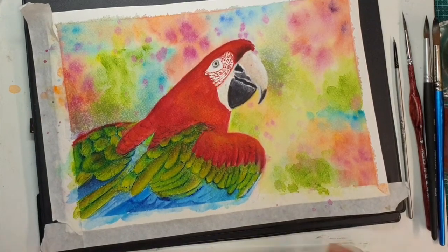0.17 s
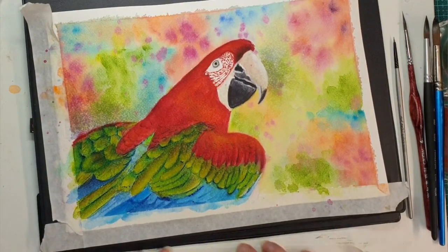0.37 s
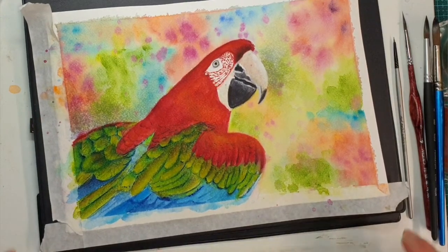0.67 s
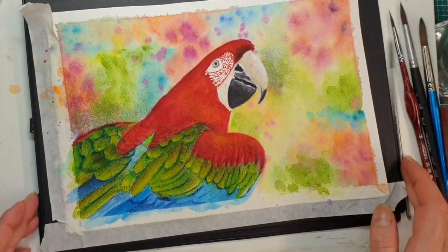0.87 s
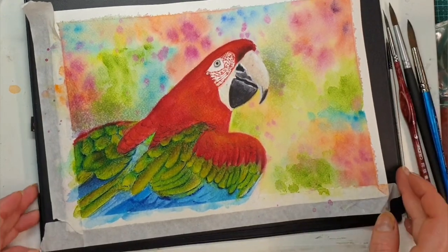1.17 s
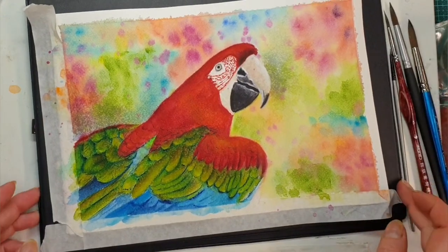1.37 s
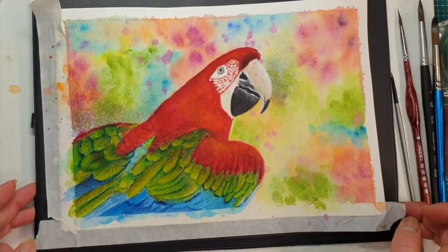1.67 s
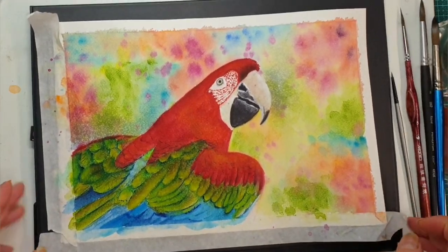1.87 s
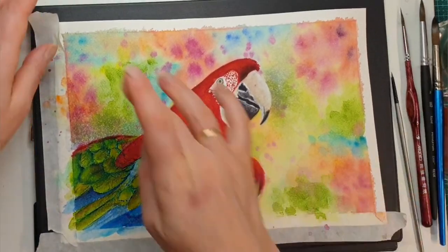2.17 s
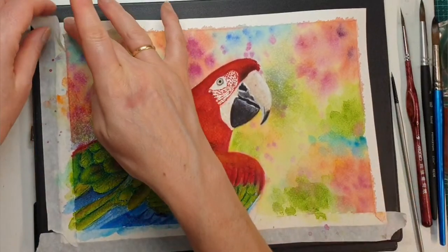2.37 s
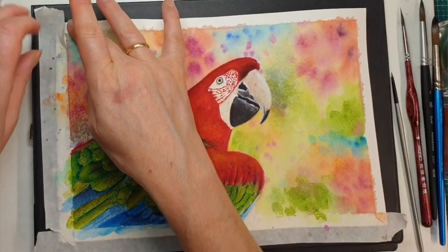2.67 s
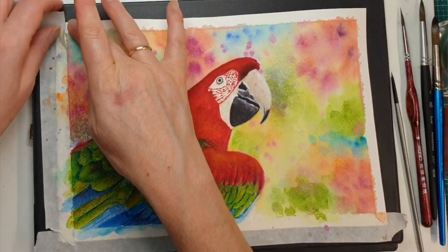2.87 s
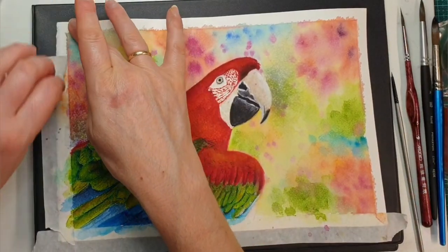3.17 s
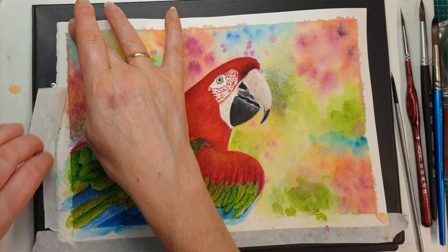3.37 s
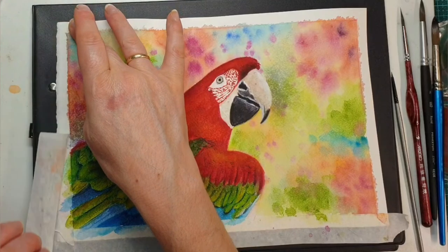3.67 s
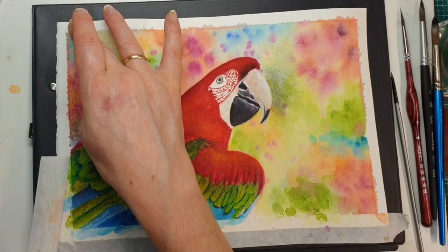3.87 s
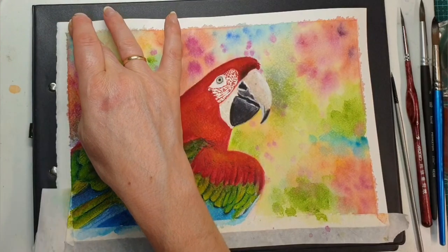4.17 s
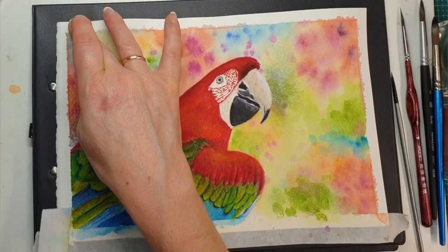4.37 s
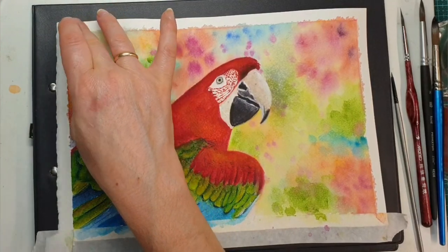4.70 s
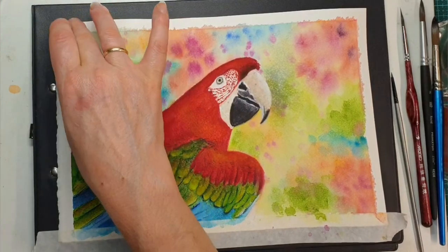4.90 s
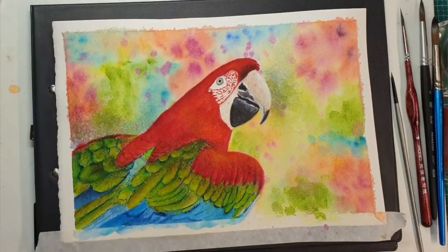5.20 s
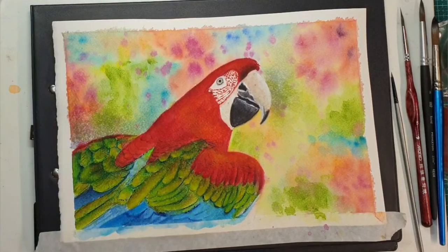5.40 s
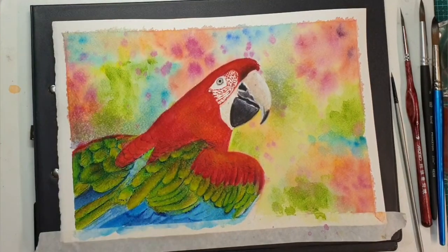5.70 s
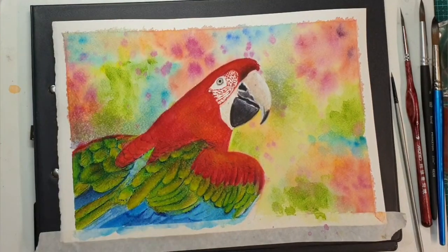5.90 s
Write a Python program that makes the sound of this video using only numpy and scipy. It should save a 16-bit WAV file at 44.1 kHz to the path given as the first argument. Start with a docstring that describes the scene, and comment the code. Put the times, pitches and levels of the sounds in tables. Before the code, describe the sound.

A quiet indoor room with soft air noise, a very faint fan whine and a low mains hum that swells and fades. At the start skin lightly brushes paper, with a clearer swish at 0.4-0.6 s. At 0.8-0.95 s thin paintbrushes knock together in a rapid, bright, woody rattle; one sharp clack follows at 1.17 s. Light scrapes and finger ticks continue to 1.9 s as the board is turned. After near quiet, a soft low palm thud comes at 2.35 s, with small taps and drags until 3 s. From 3.1 s tape peels with a strong crackling, raspy rip to 3.6 s, another surge at 3.7-4.0 s, then shorter, weaker stutters to about 5.2 s, punctuated by crisp snaps, notably at 3.2 and 3.9 s. A finger tap falls at 5.07 s; loose tape rustles softly at 5.4 and 5.7 s. Close, dry stereo.

```python
"""Peeling tape from paper

Masking tape is peeled off a watercolour on a desk, in a quiet room with a fan and a mains hum.
Hands brush the desk, knock paintbrushes together, turn the board and press on the paper;
then one strip comes away in a long crackling peel with small snaps, and the loose tape rustles.
Friction and peeling are trains of random grains; contacts are decaying noise bursts and ringing modes."""
import sys
import numpy as np
from scipy import signal
from scipy.fft import rfft, irfft, next_fast_len
from scipy.io import wavfile
from scipy.ndimage import uniform_filter1d, map_coordinates

SR = 44100
rng = np.random.default_rng(int(sys.argv[2]) if len(sys.argv) > 2 else 0)


def unload_audio(sound):
    """Save the sound as a 16-bit wav file, at the path given as the first command line argument."""
    columns = np.transpose(np.atleast_2d(sound))
    # keep every value between -1 and 1, then stretch to whole-number steps
    steps = np.round(np.clip(columns, -1, 1) * 32767)
    wavfile.write(sys.argv[1], SR, steps.astype(np.int16))


N = 266540  # length [samples]

# Levels in the tables are relative: each source function sets the balance of its layers.
# Pulls on the tape: (start [s], fastest [s], end [s], crackle level [dB], rise [dB], fall [dB],
# rasp re crackle [dB], drumming re crackle [dB])
TAPE_PULLS = [(3.086, 3.224, 3.59, -43.5, 14.5, 15, -3, -9), (3.69, 3.87, 3.98, -48.5, 11.5, 4, -6.5, -15),
              (4.03, 4.075, 4.1, -47.5, 4, 2, -9, -18.5), (4.12, 4.131, 4.485, -53, 1.5, 6.5, -10, -17.5),
              (4.52, 4.74, 4.84, -61, 4, 6, -18, -10.5), (4.852, 4.86, 4.872, -44, -1.5, 6.5, -31, -17),
              (4.982, 5.06, 5.21, -56, 3, 5.5, -4, -9.5)]
# Tape creeping off between pulls: (start [s], fastest [s], end [s], crackle level [dB], rise [dB], fall [dB])
TAPE_CREEP = (3.07, 2.5, 6, -62.5, 11, 5)
# Tape letting go and creasing: (time [s], level [dB])
TAPE_SNAPS = [(1.3069, -35.5), (3.1088, -34.5), (3.2176, -22), (3.2274, -27), (3.2774, -22.5),
              (3.4401, -30.5), (3.5558, -33), (3.681, -37), (3.7484, -33.5), (3.8906, -19), (3.9529, -25),
              (3.9654, -30), (4.0896, -21.5), (4.3704, -41.5), (4.4303, -28.5), (4.7296, -32.5),
              (4.8544, -30.5), (4.9807, -38), (5.395, -41.5)]
# Skin and loose tape sweeping over paper: (start [s], fastest [s], end [s], hiss level [dB],
# rise [dB], fall [dB], body re hiss [dB])
PAPER_SWEEPS = [(0.012, 0.11, 0.14, -46.5, 3, 2.5, -14), (0.425, 0.54, 0.605, -34.5, 21.5, 14, -21),
                (0.608, 0.62, 0.625, -48, 0.5, 3, -5), (5.397, 5.445, 5.49, -43.5, 9, 14.5, -26),
                (5.63, 5.675, 5.8, -44, 10.5, 19, -23)]
# Board, fingers and slack tape dragging on the desk: (start [s], fastest [s], end [s], scrape level [dB],
# rise [dB], fall [dB], body re scrape [dB])
DESK_DRAGS = [(0.996, 1.01, 1.094, -56, -1, 16.5, 0.5), (1.11, 1.2, 1.51, -59, 5, 7, -13),
              (1.44, 1.5, 1.595, -56, 8, 5, 2.5), (1.65, 1.67, 1.933, -48.5, 2, 17.5, -7),
              (2.4, 2.47, 2.6, -59.5, 11, 7, -6.5), (2.885, 2.96, 3.01, -60.5, 0.5, 1.5, -11),
              (5.31, 5.8, 6.4, -63.5, 4, 14, -38)]
# Paintbrushes knocking together: (time [s], click level [dB], ring level [dB], wooden knock level [dB])
BRUSH_CLACKS = [(0.811, -44, -38, -36), (0.8299, -38.5, -33, -30), (0.8369, -25.5, -16.5, -24.5),
                (0.8456, -22.5, -7, -25.5), (0.8540, -18.5, -10, -17.5), (0.8745, -19.5, -21.5, -22),
                (0.8836, -24, -32.5, -28.5), (0.9010, -23.5, -38.5, -30), (0.9125, -28, -38.5, -27),
                (0.9211, -19, -33.5, -22), (0.9272, -24, -44, -22.5), (1.1652, -31, -24, -48),
                (1.1700, -11, -17, -24.5), (1.2, -30, -33, -50.5)]
# Modes of the brush handles and ferrules: (mean frequency [Hz], mean level [dB], t60 [s])
HANDLE_MODES = [(1890, -13, 0.033), (2520, -11.5, 0.047), (2970, -9.5, 0.026), (3700, -12.5, 0.046),
                (4040, -10.5, 0.02), (4850, -17.5, 0.049), (4780, 0, 0.069), (5220, 3.5, 0.033),
                (5590, -1, .04), (5430, -0.5, 0.048), (7030, -8, .035), (7050, 1, 0.037), (7740, 2, .035),
                (7930, -12, .035), (8340, -5, 0.045), (8440, -12, 0.036), (8700, -12, 0.024),
                (9620, 1, .035), (10760, -7, .035)]
# Fingers meeting the board and paper, and at 5.07 s a tick from the peeling strip: (time [s], tick level [dB],
# body re tick [dB])
FINGER_TAPS = [(0.993, -34, -17), (1.4452, -40.5, -7), (1.5697, -32, -18), (1.6518, -39.5, -16),
               (2.4628, -41, -21.5), (2.5526, -36.5, -15.5), (2.9083, -40.5, -21), (2.9216, -40, -1.5),
               (5.0654, -31.5, -12.5)]

# Spectrum of the peeling tape's hiss: (frequency [Hz], density [dB per Hz])
TAPE_SPECTRUM = [(1500, -36), (3000, -15), (4100, -14.5), (4700, -3), (5300, 0.5), (6300, -4), (8200, -2),
                 (9800, -4.5), (11500, -2.5), (15500, -8.5)]
# Spectrum of the taut strip's rasp: (frequency [Hz], density [dB per Hz])
RASP_SPECTRUM = [(1400, -27), (2200, -10.5), (2900, 7), (3600, 8.5), (4400, 1), (7000, -42)]
# Spectrum of the drumming paper sheet: (frequency [Hz], density [dB per Hz])
SHEET_SPECTRUM = [(150, -13.5), (350, -17), (560, -7), (780, 3), (1100, 0), (1500, 0.5), (2200, -2),
                  (3500, -23), (7000, -77)]
# Spectrum of the tick as tape lets go: (frequency [Hz], density [dB per Hz])
SNAP_SPECTRUM = [(1200, -19), (2100, -20), (2800, -8), (3900, -8.5), (5200, 11), (6500, 4), (8200, 4),
                 (11500, 1.5), (15500, -2)]
# Spectrum of skin and loose tape on paper: (frequency [Hz], density [dB per Hz])
SKIN_SPECTRUM = [(1200, -41), (2000, -8.5), (3200, -4.5), (4000, -3), (5300, 0), (8000, -0.5), (12000, 0.5),
                 (15500, -3.5)]
# Spectrum of the board shaken by sweeps: (frequency [Hz], density [dB per Hz])
BOARD_SPECTRUM = [(150, -27), (400, -9), (750, 5), (1050, -0.5), (1400, 3), (1900, 2), (2600, 4.5),
                  (5000, -47.5)]
# Spectrum of scrapes and fingertip ticks: (frequency [Hz], density [dB per Hz])
SCRAPE_SPECTRUM = [(1200, -23), (2600, -2), (3900, -8.5), (5300, 1.5), (6500, -3.5), (7800, 1),
                   (11000, -2.5), (15500, -11)]
# Spectrum of the brushes' click: (frequency [Hz], density [dB per Hz])
CLICK_SPECTRUM = [(800, -15.5), (2000, -29.5), (3500, -6), (5000, 7), (6500, -5), (9500, -0.5),
                  (11500, -6.5), (16000, -13.5)]
# Spectrum of the brushes' knock on the desk: (frequency [Hz], density [dB per Hz])
KNOCK_SPECTRUM = [(60, -38), (170, -17), (280, -17), (430, -2.5), (600, -8), (830, 4), (1050, -2.5),
                  (1300, 2), (1600, 0.5), (2050, 3.5), (3000, 1.5), (6000, -23)]
# Spectrum of the flat hand's thud: (frequency [Hz], density [dB per Hz])
THUD_SPECTRUM = [(30, -24), (70, 0), (130, -1.5), (220, -1.0), (450, -31.0), (2000, -63)]

# Place of the brushes between the microphones: (frequency [Hz], left minus right [dB])
BRUSH_LEAN = [(200, -2.5), (700, 5.5), (2000, 0), (4500, 1), (8000, -7), (13000, 0)]
# Decay of the room: (frequency [Hz], t60 [s])
ROOM_DECAY = [(200, 0.44), (2000, 0.16), (6000, 0.17), (14000, 0.17)]
# Likeness of the two sides: (frequency [Hz], correlation [1])
SIDE_LIKENESS = [(100, 0.71), (300, 0.6), (650, 0.14), (1400, 0.17), (3000, -0.067), (7000, -0.067)]
# Spectrum of the room air: (frequency [Hz], gain [dB])
AIR_SPECTRUM = [(20, -54.5), (35, -22.5), (52, -12.5), (85, -12.5), (130, -17), (236, -17), (405, -28),
                (750, -24.5), (1100, -28), (1480, -30), (2400, -32.5), (3600, -36.5), (6000, -34),
                (9500, -38), (16000, -36.5)]
# Whine of a fan: (frequency [Hz], width of its wander [Hz], level [dB])
FAN_WHINE = [(714, 16, -77), (1433, 12, -80.5), (1975, 35, -80.5), (2344, 20, -76)]
# Course of the mains hum: (time [s], level [dB])
HUM_COURSE = [(0.0, -58.5), (0.1, -69), (0.86, -58.5), (0.96, -68.5), (2.56, -58), (2.67, -69.5),
              (2.88, -62), (2.98, -80), (3.28, -65.5), (3.45, -71.5), (3.55, -61), (4.17, -62.5),
              (4.31, -74), (4.36, -61.5), (4.59, -65.5), (5.7, -61), (5.96, -71), (6.04, -68)]

GRIP_DB_PER_S, RELEASE_DB_PER_S = 1100, 751  # how fast a stroke takes hold and dies away
TENSION_POWER = 1.43  # rasp and drumming grow faster than the crackle as the tape tightens
AIR_DB, HISS_DB = -65, -76  # rms levels
HUM_WAVER_DB = 1.2
TOP_HZ = 15850  # band limit


def amp(db):
    """Level is logarithmic: decibels to amplitude gain."""
    return 10 ** (np.asarray(db) / 20)


def unit(x):
    """Normalization: x at rms 1."""
    return x / np.sqrt(np.mean(x ** 2) + 1e-20)


def along(points, hz):
    """Interpolation on a logarithmic frequency axis of (frequency [Hz], value) points."""
    f, value = np.transpose(points)
    return np.interp(np.log(hz + 1), np.log(f), value)


def wobble(rate):
    """Slow fluctuation: a smooth random curve through rate knots a second."""
    knots = rng.standard_normal(int(N * rate / SR) + 4)
    return map_coordinates(knots, [np.arange(N) * rate / SR])


def filtered(x, response):
    """Linear filtering: the spectrum of x times a response of frequency."""
    m = next_fast_len(N + SR // 2)
    return irfft(rfft(x, m) * response(np.fft.rfftfreq(m, 1 / SR)), m)[..., :N]


def coloured(x, spectrum, size=2048):
    """Minimum phase: folding the cepstrum gives a causal filter, of energy 1, with the given spectrum."""
    level_db = along(spectrum, np.fft.rfftfreq(size, 1 / SR))
    cepstrum = irfft(np.log(amp(level_db)))
    cepstrum[1:size // 2] *= 2
    cepstrum[size // 2 + 1:] = 0
    kernel = irfft(np.exp(rfft(cepstrum)))
    kernel = kernel / np.linalg.norm(kernel)
    return signal.fftconvolve(x, kernel[None], axes=1)[:, :N]


def add(track, s, sound):
    """Superposition: mix a sound into the track at time s."""
    part = track[:, round(s * SR):][:, :sound.shape[-1]]
    part += sound[..., :part.shape[1]]


def grains(rate, spread_db, life):
    """Shot noise: random releases of log-normal size, energy fading with time constant life [s]; rms 1."""
    size = amp(abs(spread_db) * np.clip(rng.standard_normal(N), -2, 2))
    energy = (rng.random(N) < rate / SR) * size ** 2
    fading = signal.lfilter([1], [1, -np.exp(-1 / (life * SR))], energy)
    return unit(np.sqrt(fading) * rng.standard_normal((2, N)))


def stroke(start, fastest, end, rise_db, fall_db):
    """Friction follows speed: a movement grips, runs through its fastest moment and lets go."""
    t = np.arange(N) / SR
    speed_db = np.interp(t, [start, fastest, end], [-rise_db, 0, -fall_db])
    before, after = np.maximum(start - t, 0), np.maximum(t - end, 0)
    edges_db = GRIP_DB_PER_S * before + RELEASE_DB_PER_S * after
    return amp(np.maximum(speed_db - edges_db, -150))


def patchy(x, depth_db):
    """Moving contact shifts the colour: random gain in patches of time and frequency."""
    z = signal.stft(x, nperseg=256)[2]
    field = rng.standard_normal(z.shape[1:])
    field = uniform_filter1d(field, size=6, axis=0)
    field = uniform_filter1d(field, size=9, axis=1)
    return signal.istft(z * amp(depth_db * unit(field)), nperseg=256)[1][:, :N]


def burst(t60):
    """Modal density: the crowd of short-lived vibrations after a contact acts as decaying noise."""
    t = np.arange(SR // 5) / SR
    return amp(-60 * t / t60) * rng.standard_normal((2, len(t)))


def bursts(rows, t60):
    """Superposition of contacts: a burst for each (time [s], level [dB])."""
    track = np.zeros((2, N))
    for s, db in rows:
        add(track, s, amp(db) * burst(t60))
    return track


def peel():
    """Stepwise fracture: glue threads break in clumps; the tape hisses and rasps, the sheet drums."""
    start, fastest, end, db, rise_db, fall_db = TAPE_CREEP
    crackle = amp(db) * stroke(start, fastest, end, rise_db, fall_db)
    rasp, drum = np.zeros((2, N))
    for start, fastest, end, db, rise_db, fall_db, rasp_db, drum_db in TAPE_PULLS:
        pull = stroke(start, fastest, end, rise_db, fall_db)
        tension = pull ** TENSION_POWER
        crackle += amp(db) * pull
        rasp += amp(db + rasp_db) * tension
        drum += amp(db + drum_db) * tension
    clumping = amp(1.3 * wobble(70))
    threads = grains(rate=2200, spread_db=3, life=.0006) * clumping
    blobs = grains(rate=70, spread_db=3.5, life=.0008)  # thicker spots of glue pop singly
    breaks = threads + amp(-6.5) * blobs
    tape_hiss = amp(0.5) * coloured(breaks * crackle, TAPE_SPECTRUM)
    strip_rasp = amp(-2.0) * coloured(breaks * rasp, RASP_SPECTRUM)
    sheet_drum = amp(-1.5) * coloured(breaks * drum, SHEET_SPECTRUM)
    return patchy(tape_hiss + strip_rasp + sheet_drum, depth_db=2.5)


def snaps(tick_db, rasp_db, body_db):
    """Sudden release of tension: a bright tick twangs the taut strip and jolts the sheet."""
    jolt = bursts(TAPE_SNAPS, t60=.026)
    tick = amp(tick_db) * coloured(jolt, SNAP_SPECTRUM)
    twang = amp(rasp_db) * coloured(jolt, RASP_SPECTRUM)
    return tick + twang + amp(body_db) * coloured(jolt, SHEET_SPECTRUM)


def brushes(click_db, ring_db, knock_db):
    """Impact excites modes: each clack rings the handles at new strengths and knocks on the desk."""
    click, ring, knock = np.zeros((3, 2, N))
    t = np.arange(SR // 12) / SR
    hz, level, t60 = np.transpose(HANDLE_MODES)[:, :, None]
    for s, db, handle_db, wood_db in BRUSH_CLACKS:
        strength = amp(handle_db + level + rng.standard_normal(hz.shape) - 60 * t / t60)
        pitch = hz * (1 + .012 * rng.standard_normal(hz.shape))  # no two brushes are the same length
        # the handles chatter against their neighbours, which blurs every mode
        blur = .08 * np.cumsum(rng.standard_normal((len(hz), len(t))), axis=1)
        phase = 2 * np.pi * rng.random((2, len(hz), 1)) + blur
        modes = strength * np.sin(2 * np.pi * pitch * t + phase)
        add(ring, s, np.sum(modes, axis=1))
        add(click, s, amp(db) * burst(t60=0.057))
        add(knock, s, amp(wood_db) * burst(t60=0.06))
    clicks = amp(click_db) * coloured(click, CLICK_SPECTRUM)
    knocks = amp(knock_db) * coloured(knock, KNOCK_SPECTRUM)
    return amp(ring_db) * ring + clicks + knocks


def lean(x):
    """Level difference between microphones: the brushes' place tilts left against right by frequency."""
    sides = np.array([[1], [-1]])
    return filtered(x, lambda hz: amp(sides * along(BRUSH_LEAN, hz) / 2))


def rub(strokes, spectrum, sounding, rate, spread_db, hiss_db, body_db):
    """Stick-slip: paper fibres catch and slip under a sliding surface and shake what lies below."""
    hiss, body = np.zeros((2, N))
    for start, fastest, end, db, rise_db, fall_db, rel_db in strokes:
        slide = amp(db) * stroke(start, fastest, end, rise_db, fall_db)
        hiss += slide
        body += amp(rel_db) * slide
    slips = grains(rate, spread_db, life=0.001)
    surface = amp(hiss_db) * coloured(slips * hiss, spectrum)
    below = amp(body_db) * coloured(slips * body, sounding)
    return patchy(surface + below, depth_db=3.0)


def taps(tick_db, body_db):
    """Light impact: each tap gives a bright tick and a duller answer from the sheet."""
    tick = bursts([(s, db) for s, db, _ in FINGER_TAPS], t60=0.05)
    body = bursts([(s, db + rel_db) for s, db, rel_db in FINGER_TAPS], t60=0.055)
    bright = amp(tick_db) * coloured(tick, SCRAPE_SPECTRUM)
    return bright + amp(body_db) * coloured(body, SHEET_SPECTRUM)


def palm():
    """Soft impact favours low frequencies: the flat hand lands on the board with a thud."""
    return coloured(bursts([(2.352, -54.5)], t60=0.37), THUD_SPECTRUM)


def desk(x, share, count=10):
    """Early reflection: desk top and things on it return weak copies, different for each microphone."""
    delay = rng.uniform(.0007, .012, (2, count))  # s
    echoes = np.zeros((2, SR // 20))
    for side in range(2):
        signs = rng.choice([-1, 1], count)
        np.add.at(echoes[side], (delay[side] * SR).astype(int), share * signs)
    echoes[:, 0] = 1  # direct sound
    echoes /= np.linalg.norm(echoes, axis=1, keepdims=True)
    return signal.fftconvolve(x, echoes, axes=1)[:, :N]


def room(x):
    """Reverberation: the walls answer after 5 ms, each frequency dying at its own speed."""
    hz, t, z = signal.stft(rng.standard_normal((2, SR // 2)), SR, nperseg=256)
    decay = amp(-60 * t / along(ROOM_DECAY, hz)[:, None])
    tail = signal.istft(z * decay, SR, nperseg=256)[1]
    tail = np.pad(tail, ((0, 0), (round(.005 * SR), 0)))
    return signal.fftconvolve(x, tail / np.linalg.norm(tail[0]), axes=1)[:, :N]


def stereo(pair):
    """Spatial coherence: two microphones hear long waves alike, so each side's bass leaks into the other."""
    turn = lambda hz: np.arcsin(np.clip(along(SIDE_LIKENESS, hz), -1, 1)) / 2
    own = filtered(pair, lambda hz: np.cos(turn(hz)))
    return own + filtered(pair[::-1], lambda hz: np.sin(turn(hz)))


def air():
    """Broadband noise: shaped room air, with a narrow band of hiss around 5700 Hz."""
    breath = filtered(rng.standard_normal((2, N)), lambda hz: amp(along(AIR_SPECTRUM, hz)))
    band = filtered(rng.standard_normal((2, N)), lambda hz: 1 / (1 + ((hz - 5700) / 550) ** 2))
    return amp(AIR_DB) * unit(breath) + amp(HISS_DB) * unit(band)


def fan():
    """Phase diffusion: a random walk of phase widens each whining tone into a narrow band."""
    t = np.arange(N) / SR
    whine = np.zeros((2, N))
    for hz, width, db in FAN_WHINE:
        drift = np.sqrt(2 * np.pi * width / SR) * np.cumsum(rng.standard_normal((2, N)), axis=1)
        whine += amp(db) * np.sin(2 * np.pi * hz * t + drift)
    return amp(4) * whine


def mains_hum():
    """Harmonic tone: 100 Hz and its octave, wavering in level and phase, the same on both sides."""
    t = np.arange(N) / SR
    phase = 2 * np.pi * 100 * t + .15 * wobble(5)
    level_db = np.interp(t, *np.transpose(HUM_COURSE)) + HUM_WAVER_DB * wobble(8.4)
    return amp(level_db) * (amp(2.5) * np.sin(phase) + amp(-16.5) * np.sin(2 * phase))


def background():
    """Superposition of background sources: room air, a faint fan and a mains hum that swells and fades."""
    return stereo(air() + fan()) + mains_hum()


def scene():
    """Direct, reflected and reverberant sound: all the handwork on the desk, in the room."""
    clatter = lean(brushes(click_db=-7.0, ring_db=-13.5, knock_db=-7))
    sweeps = rub(PAPER_SWEEPS, SKIN_SPECTRUM, BOARD_SPECTRUM,
                 rate=3200, spread_db=4.5, hiss_db=2, body_db=3.0)
    drags = rub(DESK_DRAGS, SCRAPE_SPECTRUM, SHEET_SPECTRUM,
                rate=1200, spread_db=0.0, hiss_db=0.5, body_db=-1.0)
    contacts = snaps(tick_db=-7.5, rasp_db=-22.5, body_db=-33) + taps(tick_db=-6.5, body_db=-6.5) + palm()
    work = clatter + contacts + desk(peel() + sweeps + drags, share=0.3)
    return stereo(work + amp(-11.5) * room(work)) + background()


def record(dry):
    """Band limitation: nothing is kept at or above TOP_HZ."""
    return filtered(dry, lambda hz: hz < TOP_HZ)


dry = scene()
out = record(dry)
unload_audio(out)
```